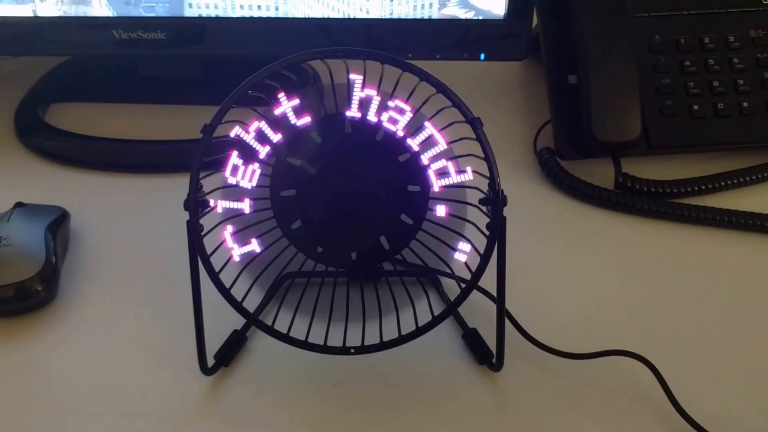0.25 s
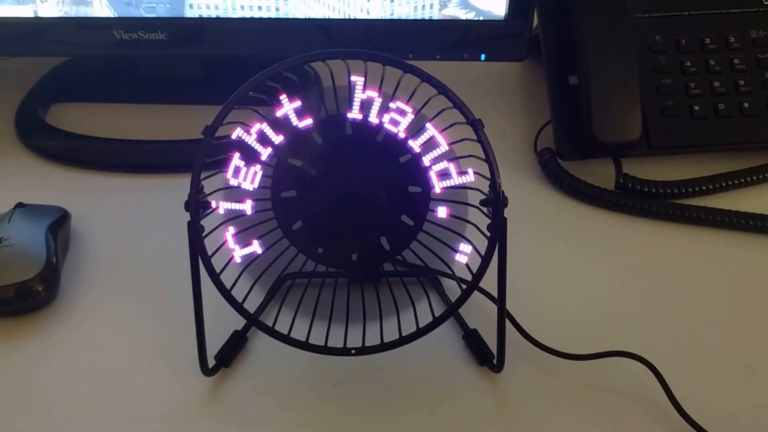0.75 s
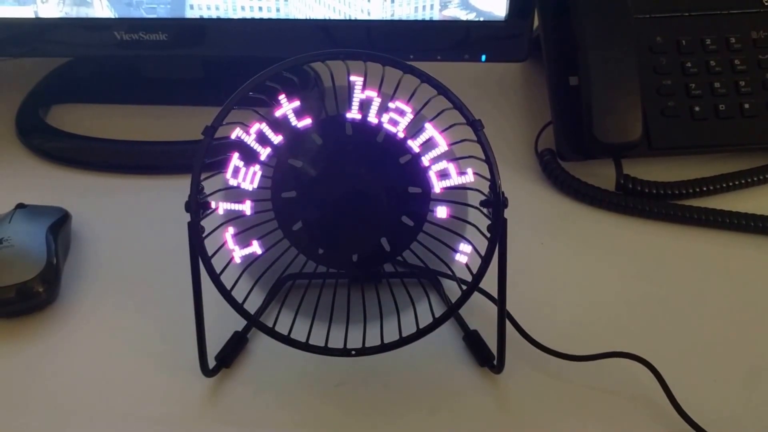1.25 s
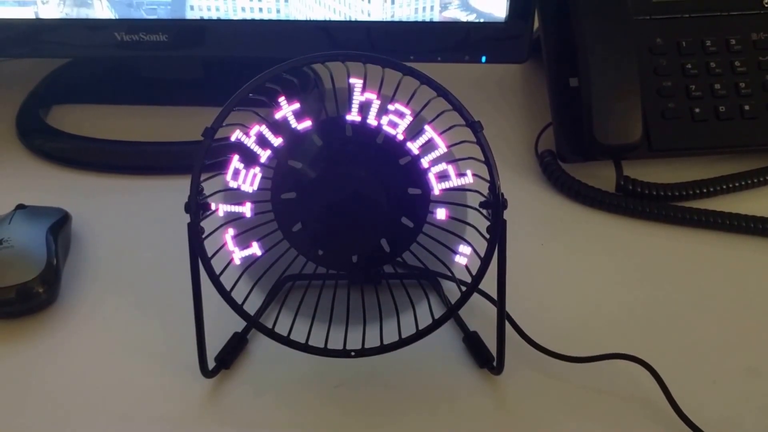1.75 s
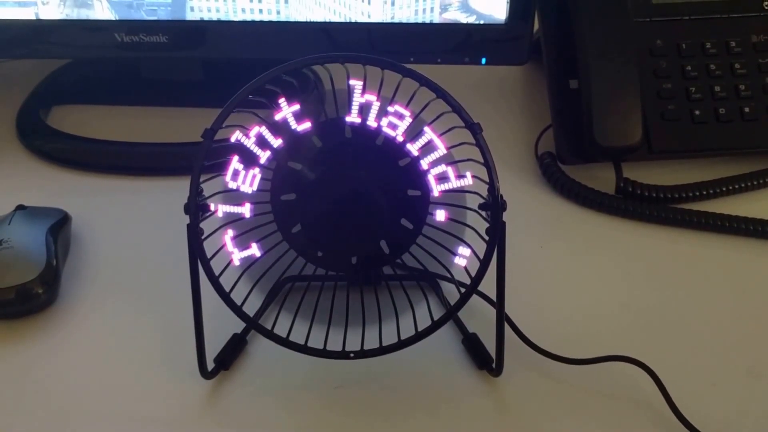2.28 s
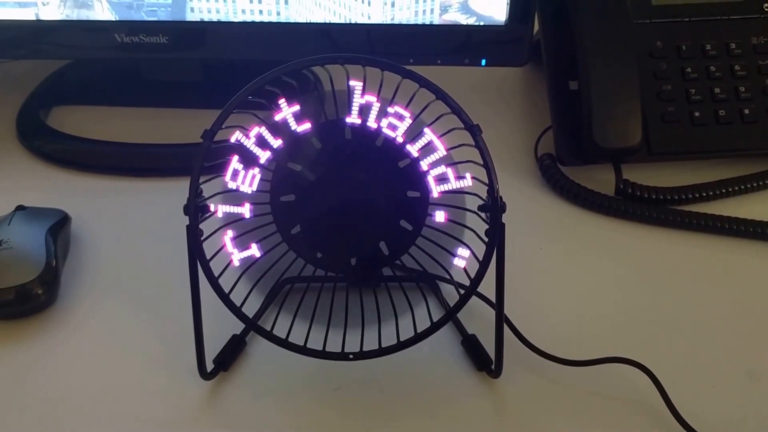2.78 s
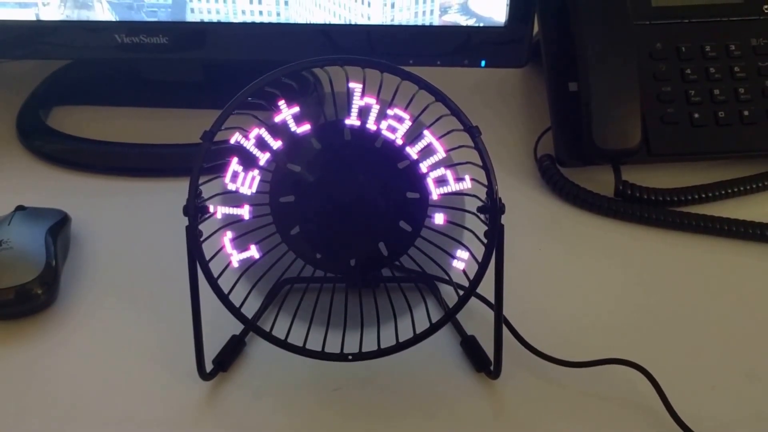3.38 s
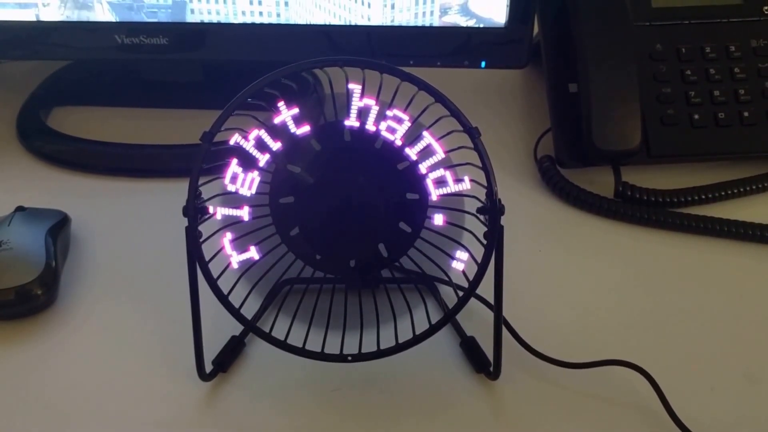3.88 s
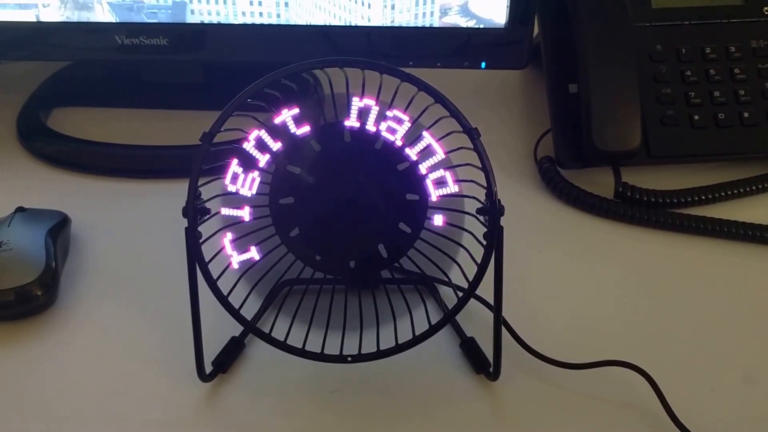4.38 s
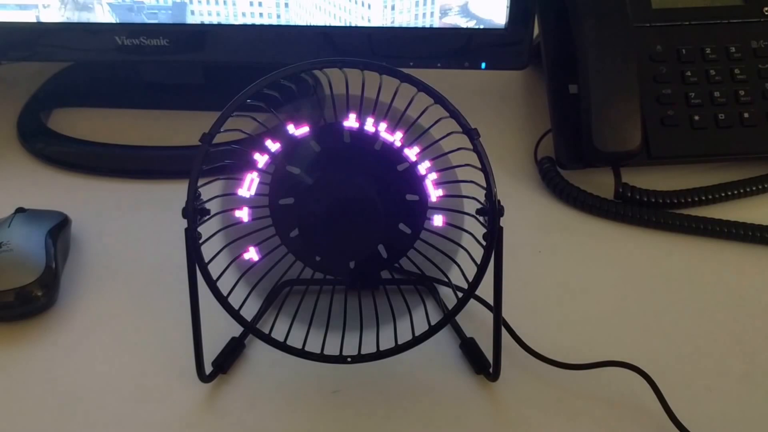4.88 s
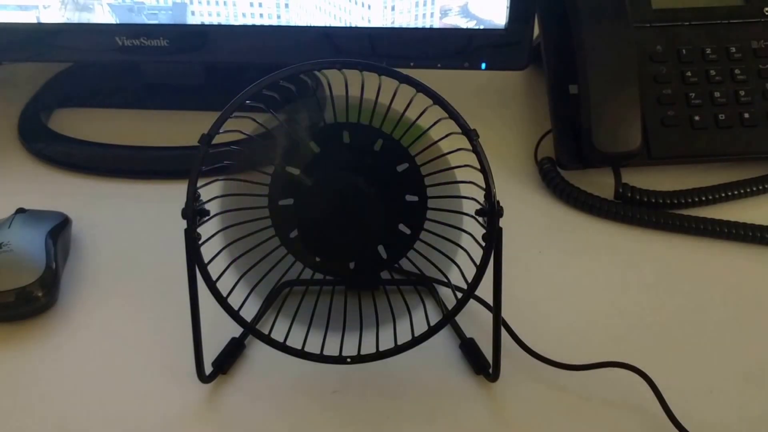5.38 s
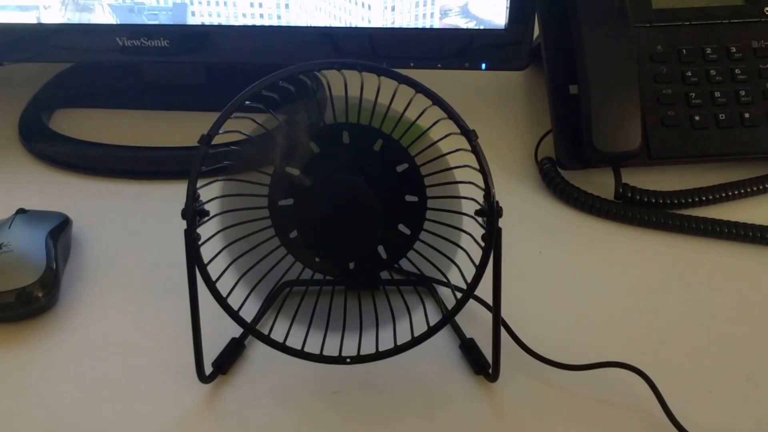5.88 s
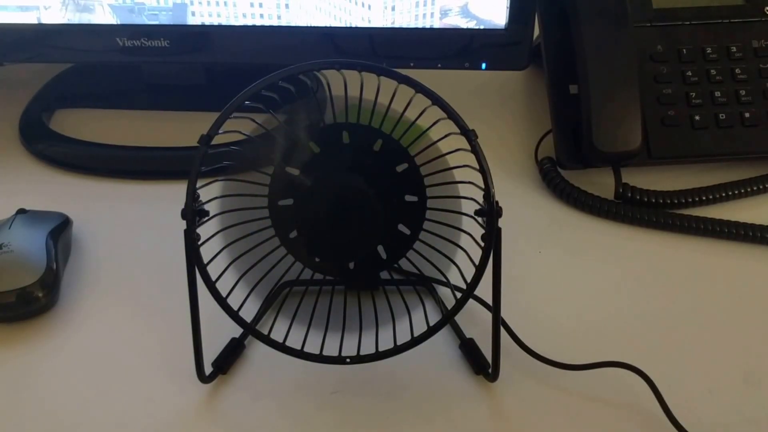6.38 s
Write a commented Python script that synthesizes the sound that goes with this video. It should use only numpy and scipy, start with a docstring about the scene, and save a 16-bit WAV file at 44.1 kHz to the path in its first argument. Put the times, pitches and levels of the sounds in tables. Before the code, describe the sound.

Close, uneven wind rumble and dull thumps from a small spinning fan, over steady airy hiss, a thin whine and sparse faint ticks.

```python
"""Air from a small desk fan buffets a camera microphone in gusts, eddies and pops, and now and then misses it.
Buffet is coloured noise; eddies and pops are push-pull pressure swings, all through the microphone's low cut.
Behind it the blades hiss (throbbing noise), the motor whines (sines on multiples of the shaft speed)
and something ticks faintly (filtered clicks).
Fast gain control ducks everything under each gust, so the hiss swells in the lulls."""
import sys
import numpy as np
from scipy import signal
from scipy.fft import rfft, irfft, next_fast_len
from scipy.io import wavfile
from scipy.ndimage import uniform_filter1d, map_coordinates

SR = 44100
rng = np.random.default_rng(int(sys.argv[2]) if len(sys.argv) > 2 else 0)


def bounce(signal):
    """Save signal as a 16-bit WAV file at the path given by the first command-line argument."""
    frames = np.transpose(np.atleast_2d(signal))
    limited = np.clip(frames, -1, 1)
    pcm = np.round(limited * 32767).astype(np.int16)
    wavfile.write(sys.argv[1], SR, pcm)


def decibels_to_gain(level_db):
    """Convert a level in decibels to a linear amplitude gain (20 dB per decade)."""
    exponent = np.asarray(level_db, float) / 20
    return 10 ** exponent


N = 292824
TIME = np.arange(N) / SR


def unit(x):
    """Scale to rms 1."""
    return x / np.sqrt(np.mean(x ** 2) + 1e-20)


def curve(rows):
    """(s, value) rows interpolated to one value per sample."""
    s, value = np.transpose(rows)
    return np.interp(TIME, s, value)


def wobble(knots_per_s):
    """A smooth random curve through normally distributed knots."""
    knots = rng.standard_normal(int(N * knots_per_s / SR) + 4)
    return map_coordinates(knots, [TIME * knots_per_s])


def filtered(x, response):
    """x times a complex response of frequency."""
    m = next_fast_len(N + 8192)
    hz = np.fft.rfftfreq(m, 1 / SR) + 1e-3
    return irfft(rfft(x, m) * response(hz), m)[:N]


def coloured(x, points):
    """x through (Hz, dB) gains interpolated on a log frequency axis."""
    f, db = np.transpose(points)
    return filtered(x, lambda hz: decibels_to_gain(np.interp(np.log(hz), np.log(f), db)))


def smooth(x, window_s):
    """Running mean, applied twice."""
    n = max(int(window_s * SR), 1)
    return np.abs(uniform_filter1d(uniform_filter1d(x, n), n))


def evened(x, window_s, exponent):
    """Divide by a power of the local power: chance swells shrink, gusts set the strength."""
    return unit(x / smooth(x ** 2, window_s) ** exponent)


def bumps(s, size, width_ms):
    """A passing eddy pushes, then sucks (or the reverse): one smooth swing each way, peak near size."""
    k = np.arange(-SR // 40, SR // 40)
    u = k / (width_ms[:, None] * SR / 1000)
    shape = size[:, None] * 3 * u / (1 + u ** 2) ** 2
    at = np.round(s * SR).astype(int)[:, None] + k + SR  # 1 s margin at both ends
    return np.bincount(at.ravel(), shape.ravel(), N + 2 * SR)[SR:SR + N]


# Faint ticks, most about a second apart. Each row: onset in seconds, click level in dB before the treble filter.
TICK_ROWS = [(0.4569, -44), (1.4611, -46), (2.466, -46), (3.469, -49), (3.8142, -44), (4.1784, -57),
             (5.474, -43), (6.477, -46)]


def ticks():
    """Single-sample clicks, filtered so that the top treble dominates."""
    s, db = np.transpose(TICK_ROWS)
    delay_s = 0.0012
    clicks = np.bincount(np.round((s + delay_s) * SR).astype(int), decibels_to_gain(db), N)
    return coloured(clicks, [(6000, -15), (9000, 15), (11500, 16), (14500, 8), (17000, -12)])


# Shaft speed. Each row: time in seconds, mean speed in turns per second.
SHAFT_SPEED = [(0.5, 40.97), (1.3, 40.95), (2.1, 40.91), (2.9, 40.84), (3.7, 40.85), (4.5, 40.86),
               (5.3, 40.87), (6.1, 40.73)]


def shaft_turns():
    """Shaft angle in turns: the integral of a slightly unsteady speed."""
    turns_per_s = curve(SHAFT_SPEED) + 0.0284 * wobble(knots_per_s=2.88)
    return np.cumsum(turns_per_s) / SR


# Colour of the hiss of blades and cage. Each row: frequency in Hz, filter gain in dB.
HISS_COLOUR = [(350, -5), (600, -7.5), (930, -9.5), (1320, -9), (1600, -12.5), (1900, -12), (2230, -7),
               (2550, -10.5), (2950, -3), (3180, -8.5), (3400, -14.5), (3850, -14), (4230, -18),
               (6000, -22.5), (8970, -27.5), (15100, -29), (15700, -35)]


def blade_hiss(turns):
    """Coloured noise whose power throbs once and twice a turn."""
    level_db = -48.0
    once = 0.11 * np.cos(2 * np.pi * turns)
    twice = 0.1 * np.cos(4 * np.pi * turns + 1.5)
    noise = unit(coloured(rng.standard_normal(N), HISS_COLOUR))
    return decibels_to_gain(level_db) * noise * np.sqrt(1 + once + twice)


# Motor whine. Each row: multiple of the shaft speed, sine amplitude in dB about which it wavers.
WHINE_PARTIALS = [(27, -68.4), (30, -66.7), (32, -67.4), (33, -64.7), (34, -72.1), (35, -70.6), (36, -64.2),
                  (37, -73.1), (38, -74.4), (39, -68.5), (40, -68.3), (41, -72.5), (42, -70.0), (43, -73.3),
                  (44, -61.4), (45, -66.5), (46, -70.4), (47, -74.9), (48, -72.0), (49, -72.4), (50, -71.6),
                  (51, -68.1), (52, -72.0), (53, -71.4), (54, -70.1), (55, -70.2), (56, -70.5), (57, -69.8),
                  (58, -73.5), (60, -69.6), (64, -70.9)]


def motor_whine(turns):
    """Sines locked to the shaft, each wavering in level on its own."""
    waver_db = 2.5
    whine = np.zeros(N)
    for multiple, db in WHINE_PARTIALS:
        level = decibels_to_gain(db + waver_db * wobble(knots_per_s=5.05))
        whine += level * np.sin(2 * np.pi * (multiple * turns + rng.random()))
    return whine


def fan():
    """Hiss and whine driven by the same shaft."""
    turns = shaft_turns()
    return blade_hiss(turns) + motor_whine(turns)


# Lulls, when the stream slips off the port. Each row: middle in seconds, half length in seconds, depth in dB.
LULL_ROWS = [(0.031, 0.032, 22), (0.104, 0.027, 18), (0.457, 0.025, 11.5), (0.692, 0.083, 14),
             (0.782, 0.045, 15), (.96, 0.078, 9), (1.334, 0.07, 9.5), (1.668, 0.065, 11.5),
             (1.877, .08, 13), (2.118, 0.062, 15.5), (2.407, 0.047, 7), (2.82, 0.05, 6), (2.94, 0.12, 4.5),
             (3.093, 0.074, 4), (3.356, 0.025, 12), (3.435, 0.042, 2), (3.89, 0.066, 16.5),
             (3.97, 0.046, 12.5), (4.093, 0.042, 14), (4.548, 0.022, 8), (4.623, 0.017, 4.5),
             (4.827, 0.04, 6), (4.959, 0.076, 6.5), (5.277, 0.074, 21), (5.473, 0.039, 13),
             (5.747, 0.043, 19), (5.89, 0.055, 11), (6.096, .05, 6.5), (6.328, 0.13, 3)]


def lull_depth_db():
    """Depth of the lulls over time: sloping sides and a flat bottom."""
    edge = 1.31  # side steepness; over 1 flattens the bottom
    depth_db = np.zeros(N)
    for middle_s, half_s, db in LULL_ROWS:
        depth_db += db * np.clip(edge * (1 - np.abs(TIME - middle_s) / half_s), 0, 1)
    return depth_db


# Buffet colour. Each row: frequency in Hz, filter gain in dB.
BUFFET_COLOUR = [(13, -34), (22, -54), (41, -3), (65, 1.5), (126, -3.5), (220, -12.5), (290, -31.5),
                 (480, -120)]


def buffet():
    """Slow pressure swings of the stream: low coloured noise, rms 1."""
    return evened(coloured(rng.standard_normal(N), BUFFET_COLOUR), window_s=0.07, exponent=0.45)


# Eddy colour. Each row: frequency in Hz, filter gain in dB.
EDDY_COLOUR = [(40, -47), (80, -8.5), (150, 0), (300, 4), (600, 0.5), (1200, -9), (2500, -16)]


def eddy_shower():
    """Small eddies at random times, sizes and widths, rms 1."""
    draw = rng.random((600, 4))
    s = draw[:, 0] * N / SR
    size_db = -3.5 * np.log(1 - draw[:, 2])  # a few are much stronger
    size = np.sign(draw[:, 1] - 0.5) * decibels_to_gain(size_db)
    shower = bumps(s, size, width_ms=1.124 * 2.57 ** draw[:, 3])
    return evened(coloured(shower, EDDY_COLOUR), window_s=0.089, exponent=0.31)


# Strongest eddies, levels ahead of the low cut.
# Each row: middle in seconds, nominal peak in dB, width in ms, nominal thump peak in dB.
POP_ROWS = [(0.052, -10, 1.52, -20), (0.068, -15, 0.99, -15), (0.11, -13, 1.18, -33),
            (0.179, -10.5, 0.77, -27), (0.199, -10.5, 1.2, -16), (0.211, -6, 1.3, -25),
            (0.268, -11.5, 1.25, -20), (0.338, -12, 1.22, -30), (0.382, -4, 1.34, -20),
            (0.54, -20.5, 0.8, -12), (0.623, -13.5, 1.19, -11.5), (0.739, -23.5, 1.43, -25),
            (0.803, -20.5, 1.47, -24), (0.869, -20, 1.17, -17), (1.038, -15, 1.4, -7.5),
            (1.152, -15, 1.13, -23), (1.388, -7, 1.09, -10), (1.458, -8.5, 0.98, -21),
            (1.51, -19, 0.94, -10.5), (1.572, -11, 0.75, -27), (1.586, -16.5, 0.74, -8.5),
            (1.696, -6, 0.81, -8.5), (1.75, -20, 1.53, -20), (1.925, -23, 1.5, -15),
            (2.024, -20, 1.13, -22), (2.157, -21, 1.7, -11.5), (2.197, -9, 1.22, -17),
            (2.243, -11.5, 1.18, -15), (2.343, -11, 1.48, -13), (2.568, -14.5, 1.17, -17),
            (2.704, -15, 1.8, -17), (2.76, -20, 1.73, -20), (2.864, -12.5, 0.51, -8),
            (2.99, -14, 2.14, -18), (3.075, -9, 1.4, -30), (3.16, -19.5, 1.08, -18.5),
            (3.197, -19, 1.39, -19), (3.375, -15, 0.91, -18), (3.481, -14, 1.37, -30),
            (3.641, -9.5, 1.5, -12), (3.749, -6, 0.99, -19), (3.776, -13.5, 1.01, -17),
            (3.836, -13, 1.16, -29), (3.912, -18.5, 1.3, -26), (4.032, -12.5, 0.67, -21),
            (4.125, -18, 1.56, -8.5), (4.208, -14, 1.7, -16), (4.231, -13.5, 0.89, -17),
            (4.257, -16.5, 1.22, -12), (4.435, -14.5, 1.55, -19), (4.576, -14.5, 1.53, -14),
            (4.664, -18.5, 1.17, -17), (4.73, -17, 1.49, -25), (4.781, -13.5, 1.06, -27),
            (4.89, -19.5, 1.44, -19), (5.071, -8.5, 1.93, -27), (5.116, -15, 1.3, -21),
            (5.21, -12, 1.8, -14.5), (5.334, -18, 1.58, -16), (5.385, -20.5, 1.35, -15),
            (5.448, -11.5, 1.57, -36), (5.502, -18, 0.95, -19), (5.594, -18.5, 1.3, -21),
            (5.665, -13, 1.13, -15.8), (5.681, -8, 1.03, -7), (5.811, -15, 0.65, -38),
            (5.825, -11, 1.2, -17), (5.968, -15.5, 1.2, -27), (6.012, -7, 0.97, -17.5),
            (6.048, -16.5, 0.71, -33), (6.084, -13.5, 1.28, -36), (6.139, -11.5, 0.78, -14),
            (6.159, -15, 1.06, -20), (6.192, -17, 0.88, -17), (6.212, -10, 0.83, -8.5),
            (6.253, -9.5, 1.1, -36), (6.414, -14.5, 1.4, -18), (6.484, -13, 0.96, -15.5),
            (6.501, -18, 0.86, -11), (6.578, -16, 1.5, -26), (6.618, -14, 0.97, -17)]


def pops():
    """Each pop has two weaker swings nearby and a slow thump of opposite sign just after."""
    s, db, width_ms, thump_db = np.transpose(POP_ROWS)
    draw = rng.random((len(s), 7)).T
    sign = np.sign(draw[:3] - 0.5)
    out = bumps(s, decibels_to_gain(db) * sign[0], width_ms)
    out += bumps(s + 0.0037, -decibels_to_gain(thump_db) * sign[0], np.full(len(s), 4.2))
    for way, lag, loss in zip(sign[1:], draw[3:5], draw[5:]):
        offset_s = 0.01198 * width_ms * (lag - 0.3)  # some precede the pop
        swing_db = db - 3.5 - 5.8 * loss
        out += bumps(s + offset_s, way * decibels_to_gain(swing_db), 1.146 * width_ms)
    return out


def port(x, cut_hz):
    """The microphone's low cut, two resonant second-order stages, rings briefly after every push."""
    return filtered(x, lambda hz: (1 / (1 - (cut_hz / hz) ** 2 - 1j * 1.07 * cut_hz / hz)) ** 2)


# Air stream between lulls. Each row: time in seconds, buffet level in dB rms before flutter and low cut.
GUST_LEVEL = [(0, -19), (.25, -22), (.55, -22), (.85, -24), (1.06, -18.5), (1.25, -25), (1.6, -19.5),
              (2.0, -24.5), (2.55, -26.5), (2.75, -24), (3.3, -24), (3.55, -31), (3.8, -22.5), (4.15, -20),
              (4.5, -25), (5.2, -23), (5.5, -24.5), (5.75, -17.5), (6.1, -23.5), (6.64, -18.5)]


def air_stream():
    """Gusts, lulls and random flutter set buffet and eddies; pops add at their own levels."""
    gust_db = curve(GUST_LEVEL)
    lull_db = lull_depth_db()
    flutter_db = 4.5 * wobble(knots_per_s=22)
    buffet_db = gust_db - lull_db + 0.39 * flutter_db
    eddy_db = gust_db - 7.5 - 1.13 * lull_db + flutter_db  # lulls cut eddies deeper
    pressure = decibels_to_gain(buffet_db) * buffet() + decibels_to_gain(eddy_db) * eddy_shower() + pops()
    return port(pressure, cut_hz=44.2)


def scene():
    """Everything the single microphone receives."""
    return (ticks() + fan() + air_stream())[None]


def roll_off(x):
    """The treble ends steeply here."""
    return signal.sosfilt(signal.butter(12, 15960, fs=SR, output="sos"), x)


def record(dry):
    """Gain control: recent power, 10 ms decay, turns the level down above a soft knee."""
    memory_s, knee_db, slope, makeup_db = 0.01, -36.5, 0.36, 2
    keep = np.exp(-1 / (memory_s * SR))
    power = signal.lfilter([1 - keep], [1, -keep], dry ** 2)
    over_db = 10 * np.log10(1 + power / decibels_to_gain(knee_db) ** 2)
    mix = dry * decibels_to_gain(makeup_db - slope * over_db)
    return roll_off(mix)


dry = scene()
out = record(dry)
bounce(out)
```